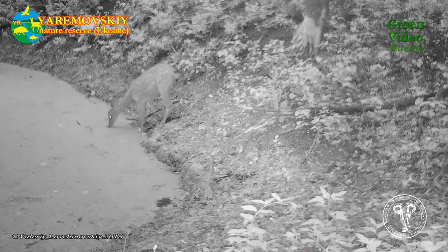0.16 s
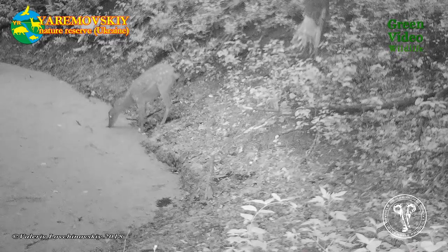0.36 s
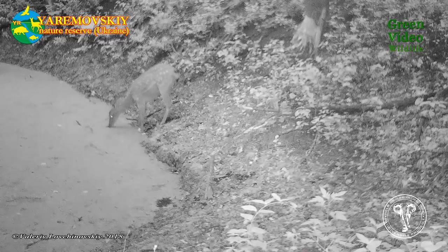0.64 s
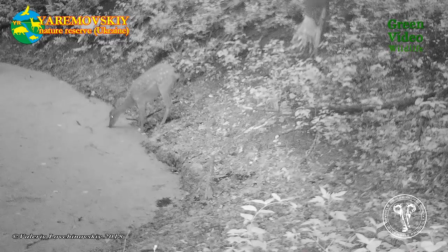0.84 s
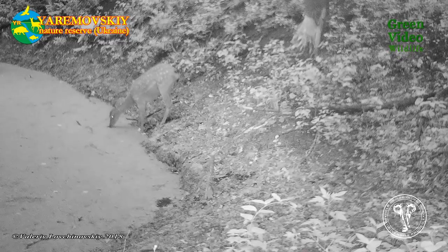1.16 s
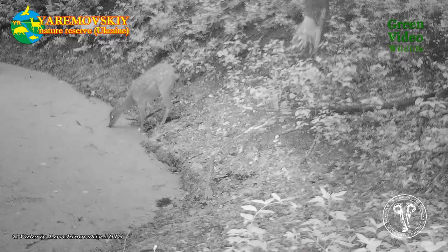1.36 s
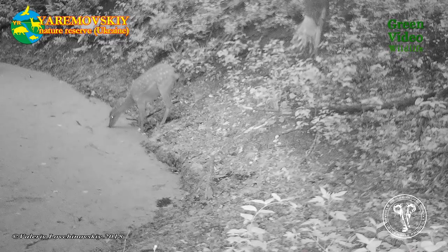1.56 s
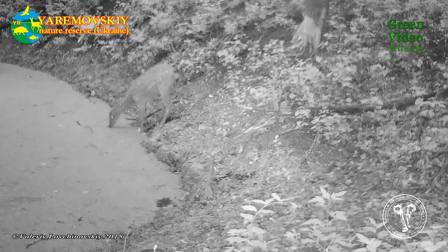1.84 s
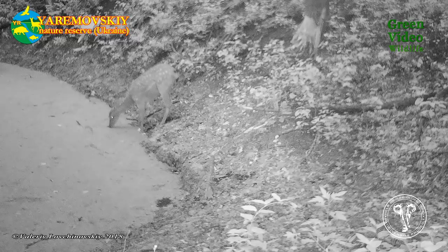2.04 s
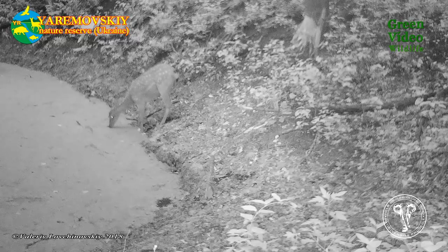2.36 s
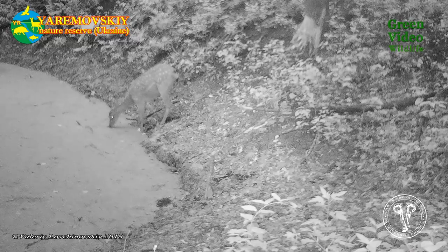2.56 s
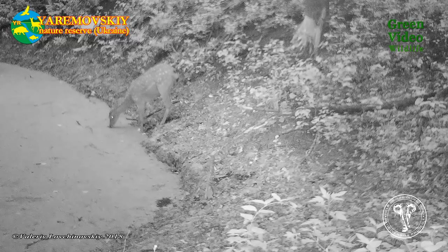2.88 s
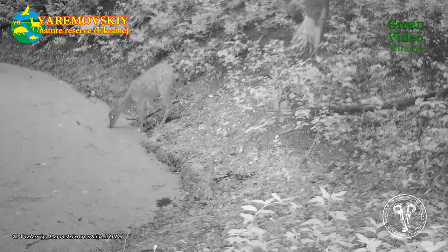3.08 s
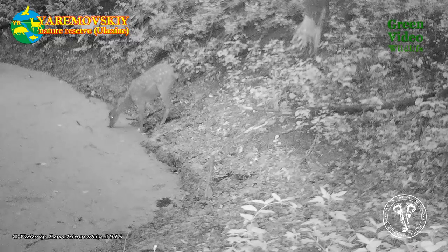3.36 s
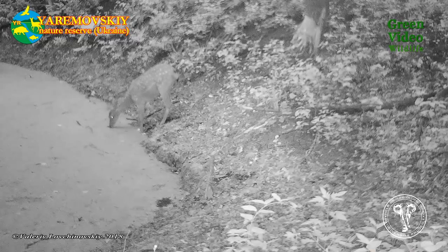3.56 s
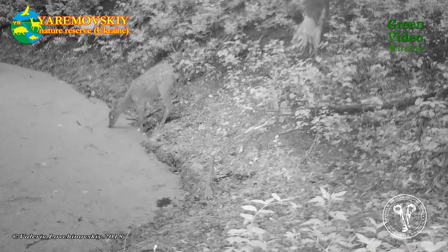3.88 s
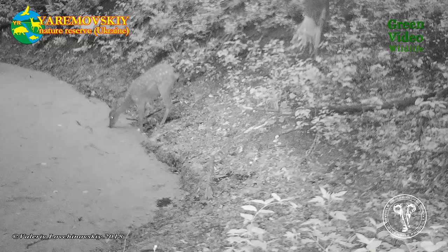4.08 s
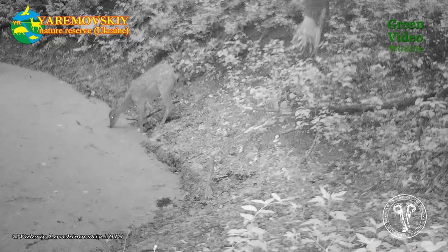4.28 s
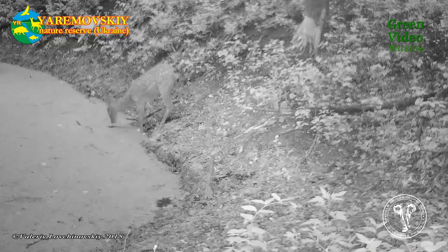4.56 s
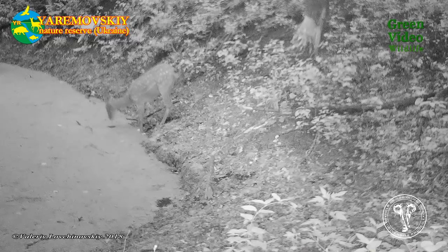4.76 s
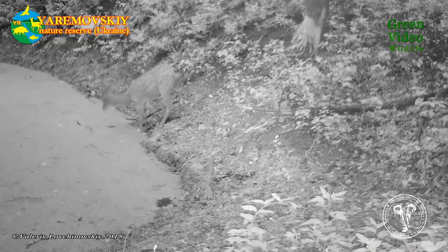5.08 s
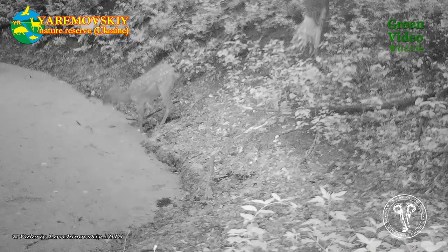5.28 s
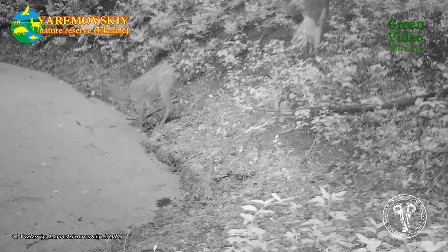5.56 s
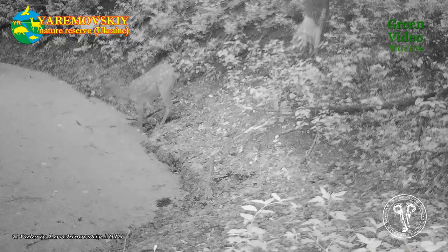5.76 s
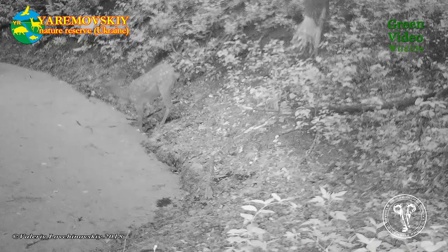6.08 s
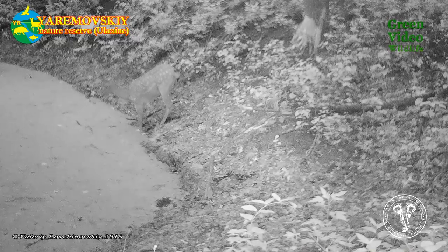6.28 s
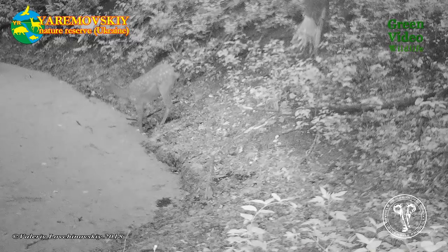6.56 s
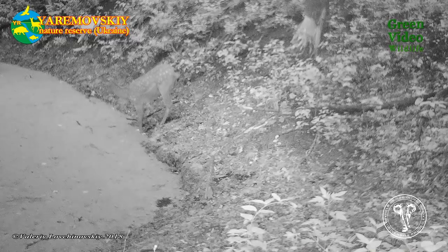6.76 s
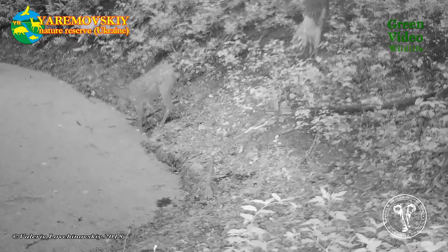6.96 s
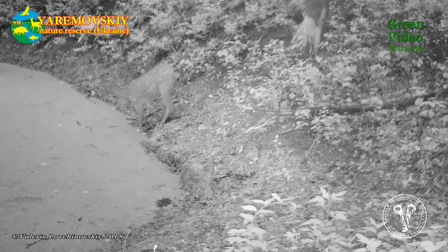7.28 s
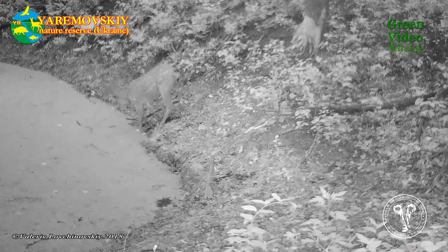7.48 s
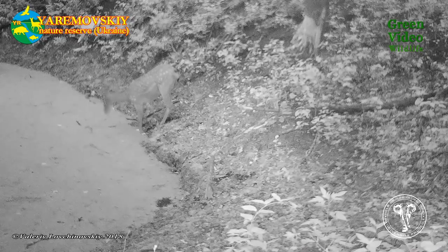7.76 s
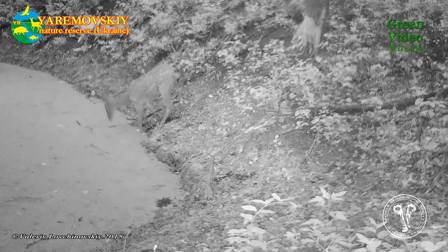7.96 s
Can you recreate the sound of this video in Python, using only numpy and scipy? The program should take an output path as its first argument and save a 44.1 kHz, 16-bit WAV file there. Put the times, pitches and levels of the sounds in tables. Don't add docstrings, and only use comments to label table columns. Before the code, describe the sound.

Night forest pond: fast, very high cricket trills start and stop over a continuous insect chorus, with faint laps and leaf rustles from a drinking deer.

```python
import sys
import numpy as np
from scipy import signal
from scipy.fft import rfft, irfft, next_fast_len
from scipy.io import wavfile
from scipy.ndimage import map_coordinates

SR = 44100
rng = np.random.default_rng(int(sys.argv[2]) if len(sys.argv) > 2 else 0)


def undo_db(level):
    steps = np.asarray(level, float) / 20
    return 10 ** steps


def generate_wav(signal):
    frames = np.transpose(np.atleast_2d(signal))
    scaled = np.clip(frames, -1, 1) * 32767
    pcm = np.round(scaled).astype(np.int16)
    wavfile.write(sys.argv[1], SR, pcm)


N = 358533

# delay_s, rise_s, hold_s, fall_s, level_db, tilt_db_per_octave
STROKE_PARTS = [
    (.003, 0.012, 0.0077, 0.014, -3.5, 11),
    (0.012, .012, 0.011, 0.0067, -0.5, -8),
    (0.031, .008, .012, 0.024, -1.5, 2.5),
    (.043, .012, 0.017, .020, -1, -5.5),
]
# freq_hz, density_db_per_hz
WING_SPECTRUM = [(2500, -36), (3500, -27.5), (4900, -20), (5700, -16.5), (7300, -22), (8100, -14),
                 (9300, -3), (10100, 4), (10800, 0), (11800, -7), (12800, -7.5), (13500, -20), (13800, -32),
                 (15500, -28.5)]
# start_s, syllable_count, first_gap_s, gap_growth_s
SONG_RUNS = [
    (0.0, 1, .088, 0),
    (.457, 15, .08861, -.00017),
    (1.983, 19, .08419, .00048),
    (3.938, 19, .08384, .00042),
    (5.972, 24, .08598, .00019),
]
# time_s, level_db
EFFORT_CURVE = [(0.0, -36), (.72, -36), (1.0, -32), (1.6, -33), (1.98, -36), (2.08, -32.5), (2.95, -32.5),
                (3.12, -36), (3.48, -33.5), (3.94, -34.5), (4.3, -32), (4.75, -33), (5.42, -32.5),
                (5.97, -37.5), (6.25, -31.5), (7.5, -32.5), (7.75, -34)]
# freq_hz, width_hz, gain_db
ECHO_PATHS = [(4565, 40, 4.8), (5663, 40, 3.6), (6438, 40, 3.4), (6525, 40, 3.9), (9475, 40, 5.1),
              (9561, 40, 4.1), (10336, 40, 5.4), (10465, 40, 3.4), (10788, 40, 3.2), (10874, 40, 3.8),
              (11090, 40, 3.4), (11434, 40, 5.1), (11606, 40, 3.9), (12274, 40, 2.5), (12748, 40, 4.6),
              (13114, 40, 4.3), (13523, 40, 5.5)]
# freq_hz, width_hz, gain_db
ECHO_NOTCH = (12850, 90, -8.0)
# time_s, level_db
BACKGROUND_LEVEL = [(0.0, 2.5), (.18, -2.5), (.68, -3), (1.11, .5), (1.58, .5), (1.81, -2), (2.04, -2),
                    (2.49, 1), (3.46, 0), (3.82, -2.5), (4.37, .5), (5.23, .5), (6.09, -1.5), (6.41, 0.5),
                    (6.93, 1), (7.77, 0), (8.13, 1.5)]
# freq_hz, density_db_per_hz
CHORUS_SPECTRUM = [(2000, -26.5), (3500, -24.5), (4900, -20), (6300, -17), (7640, -18.5), (9240, -1),
                   (9860, -0.4), (11500, -10.5), (13000, -21), (15500, -34)]
# freq_hz, width_hz, gain_db
CHORUS_PEAKS = [(9483, 14, 8.0), (9555, 10, 8.0)]
# freq_hz, density_db_per_hz
HISS_SPECTRUM = [(120, -28), (200, -2), (2010, -16), (3920, -19.5), (6000, -26.5), (7800, -48),
                 (13200, -120)]
# freq_hz, density_db_per_hz
RUMBLE_SPECTRUM = [(7.1, -26), (12, 0.5), (43, -0.5), (135, -3), (500, -17.5), (650, -21), (1100, -120)]
# start_s, length_s, level_db, low_hz, high_hz
LEAF_BURSTS = [(4.115, 0.058, -45, 4500, 8300), (4.122, 0.03, -42, 810, 2300),
               (4.135, 0.074, -45, 840, 1700), (5.725, 0.027, -43.5, 3800, 7200),
               (5.84, .035, -48, 1400, 1800), (5.845, .025, -46.5, 2200, 5800),
               (7.658, 0.03, -51, 2500, 2800), (7.66, .02, -41, 1350, 1850), (7.65, .03, -48, 5400, 7000),
               (7.808, 0.011, -43, 650, 1900), (.165, .03, -50, 1400, 1700), (6.2, 0.12, -50, 530, 2400),
               (5.19, .09, -51, 2500, 3900)]
# start_s, peak_db, pitch_hz, t60_s
TONGUE_LAPS = [(0.177, -39, 1300, 0.025), (5.0699, -40, 1470, 0.025), (5.255, -41, 1020, 0.024),
               (5.2974, -37, 1750, 0.027), (5.7462, -36, 1570, 0.023), (5.8634, -39, 1940, 0.025),
               (6.2602, -41, 1510, 0.025), (6.3754, -40, 1320, 0.025), (7.5293, -39, 1070, 0.025),
               (7.6675, -38, 2000, 0.023), (7.8106, -38, 1410, 0.015)]
# start_s, peak_db, pitch_hz, t60_s
WATER_DROPS = [
    (4.815, -32.5, 1450, 0.088),
    (5.8566, -40, 1574, 0.075),
    (6.8698, -34, 1410, 0.025),
]
# start_s, peak_db, pitch_hz, t60_s
WATER_TICKS = [(4.1356, -39, 2620, 0.035), (4.1464, -38, 2470, 0.04), (4.9447, -40, 2150, 0.04),
               (5.198, -42.5, 2640, 0.04), (5.218, -42, 2730, 0.04), (5.2683, -37, 2530, 0.04),
               (6.4428, -39, 2600, 0.04), (7.0189, -42, 3090, 0.02), (7.664, -38, 2620, 0.04)]

TEETH_PER_S, TOOTH_SPREAD_DB, STROKE_SPREAD_DB = 4500, 2, .8
FIRST_SYLLABLE_DB, LAST_SYLLABLE_DB = -1, -5.5
FOLIAGE_T60_S, FOLIAGE_DB = .05, -11.0
FOREST_T60_S, FOREST_DB = .9, -4.0
CHORUS_DB, HISS_DB, RUMBLE_DB = -34.5, -44.5, -41
CHORUS_FOLLOWS, HISS_FOLLOWS, RUMBLE_FOLLOWS = 1.06, 0.83, 0.89


def colour(x, *curves_db):
    size = next_fast_len(N + SR)
    hz = np.maximum(np.arange(size // 2 + 1) * SR / size, 1)
    gain = undo_db(sum(curve(hz) for curve in curves_db))
    y = irfft(rfft(x, size) * gain, size)[:N]
    return y / np.sqrt(np.mean(y ** 2))


def through(points):
    point_hz, point_db = np.transpose(points)
    return lambda hz: np.interp(np.log(hz), np.log(point_hz), point_db)


def bumps(rows):
    return lambda hz: sum(db / (1 + (2 * (hz - centre) / width) ** 2) for centre, width, db in rows)


def tilt(db_per_octave):
    return lambda hz: db_per_octave * np.log2(np.clip(hz, 8500, 14000) / 10000)


def drift(changes_per_s):
    knots = rng.standard_normal(400)
    return map_coordinates(knots, [np.arange(N) / SR * changes_per_s], order=3, mode="wrap")


def scatter(x, t60_s):
    t = np.arange(2 * SR) / SR
    tail = rng.standard_normal(len(t)) * undo_db(-60 * t / t60_s)
    return signal.fftconvolve(x, tail / np.sqrt(np.sum(tail ** 2)))[:N]


def syllables():
    starts = []
    for start_s, count, gap_s, growth_s in SONG_RUNS:
        k = np.arange(count)
        starts.append(start_s + gap_s * k + growth_s * k * (k - 1) / 2)
    start_s = np.concatenate(starts)
    rests = np.diff(start_s, append=start_s[-1]) > .2
    level_db = np.interp(start_s, *np.transpose(EFFORT_CURVE))
    level_db = level_db + LAST_SYLLABLE_DB * rests + FIRST_SYLLABLE_DB * np.roll(rests, 1)
    return np.c_[start_s, level_db]


def singer():
    t, out = np.arange(N) / SR, np.zeros(N)
    song = syllables()
    for delay_s, rise_s, hold_s, fall_s, stroke_db, tilt_db in STROKE_PARTS:
        teeth = (rng.random(N) < TEETH_PER_S / SR) * rng.choice([-1, 1], N)
        teeth = teeth * undo_db(TOOTH_SPREAD_DB * np.minimum(rng.exponential(1, N), 4))
        rasp = colour(teeth, through(WING_SPECTRUM), tilt(tilt_db))
        pressure = np.zeros(N)
        corners_s = np.cumsum([0, rise_s, hold_s, fall_s])
        uneven_db = STROKE_SPREAD_DB * rng.standard_normal(len(song))
        for (start_s, level_db), own_db in zip(song, uneven_db):
            i = slice(int(start_s * SR), int((start_s + .15) * SR))
            shape = np.interp(t[i] - start_s - delay_s, corners_s, [0, 1, 1, 0])
            pressure[i] += undo_db(level_db + stroke_db + own_db) * shape
        out += rasp * pressure
    return out


def bush_and_forest(x):
    loudness = np.sqrt(np.mean(x ** 2))
    foliage = scatter(x, FOLIAGE_T60_S)
    forest = loudness * colour(scatter(x, FOREST_T60_S), tilt(-2.0))
    heard = x + undo_db(FOLIAGE_DB) * foliage + undo_db(FOREST_DB) * forest
    paths = bumps(ECHO_PATHS + [ECHO_NOTCH])
    return colour(heard, lambda hz: 1.2 * paths(hz)) * loudness * undo_db(1.3)


def background():
    swell_db = np.interp(np.arange(N) / SR, *np.transpose(BACKGROUND_LEVEL))
    chorus = colour(rng.standard_normal(N), through(CHORUS_SPECTRUM), bumps(CHORUS_PEAKS))
    chorus *= undo_db(CHORUS_DB + CHORUS_FOLLOWS * swell_db + 0.57 * drift(15))
    hiss = colour(rng.standard_normal(N), through(HISS_SPECTRUM))
    hiss *= undo_db(HISS_DB + HISS_FOLLOWS * swell_db + .45 * drift(6))
    rumble = colour(rng.standard_normal(N), through(RUMBLE_SPECTRUM))
    rumble *= undo_db(RUMBLE_DB + RUMBLE_FOLLOWS * swell_db)
    return chorus + hiss + rumble


def leaves():
    out, size = np.zeros(N), SR // 5
    for start_s, length_s, level_db, low_hz, high_hz in LEAF_BURSTS:
        draw = rng.random((2, size))
        snaps = (draw[0] < 600 / SR) * (draw[1] - .5)
        scrape = 0.048 * (draw[0] - .5)
        band = signal.butter(2, [low_hz, high_hz], "band", fs=SR, output="sos")
        burst = signal.sosfilt(band, snaps + scrape)
        window = np.sin(np.pi * np.minimum(np.arange(size) / SR / length_s, 1))
        i = int(start_s * SR)
        out[i:i + size] += undo_db(level_db) * window * burst / burst.std()
    return out


def water():
    out, t = np.zeros(N + SR), np.arange(SR // 5) / SR
    for start_s, peak_db, pitch_hz, t60_s in WATER_DROPS + TONGUE_LAPS + WATER_TICKS:
        decay = undo_db(peak_db + 0.5 - 60 * t / max(t60_s, .005))
        i = int(start_s * SR)
        out[i:i + len(t)] += np.sin(2 * np.pi * pitch_hz * t) * decay
    return out[:N]


def scene():
    mono = bush_and_forest(singer()) + background() + leaves() + water()
    return np.array([mono, mono])


def low_pass(x):
    return signal.sosfilt(signal.butter(12, 14560, fs=SR, output="sos"), x)


def record(dry):
    return low_pass(dry)


dry = scene()
out = record(dry)
generate_wav(out)
```